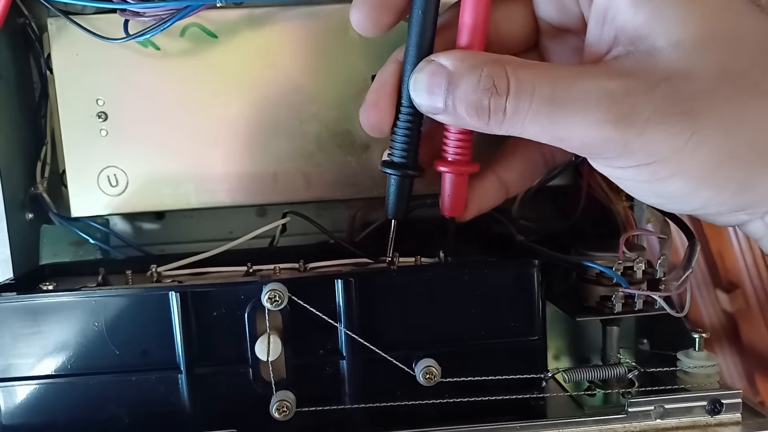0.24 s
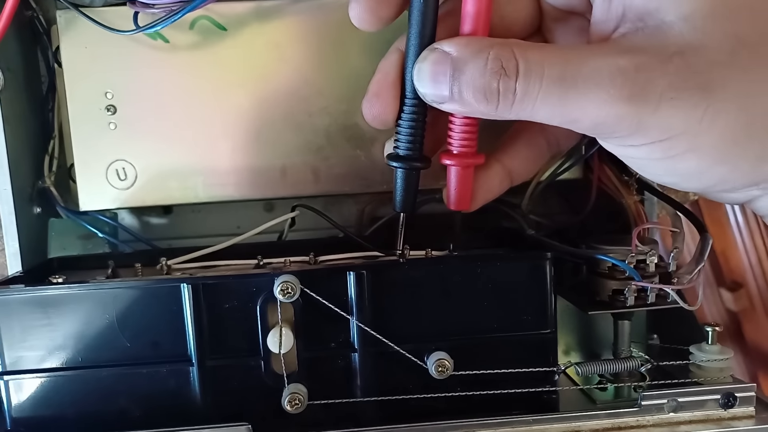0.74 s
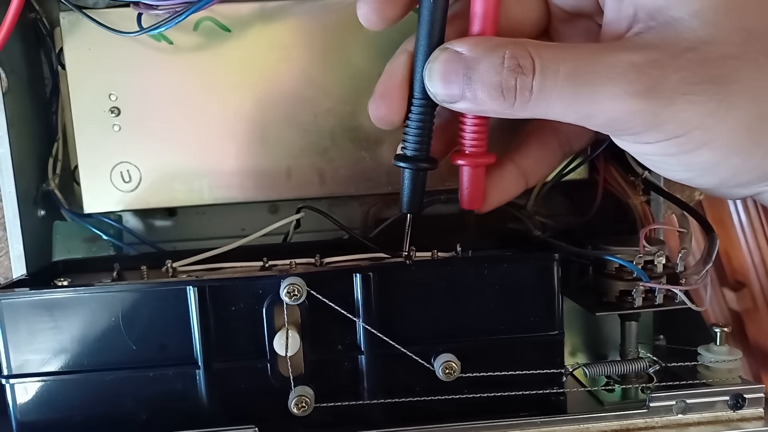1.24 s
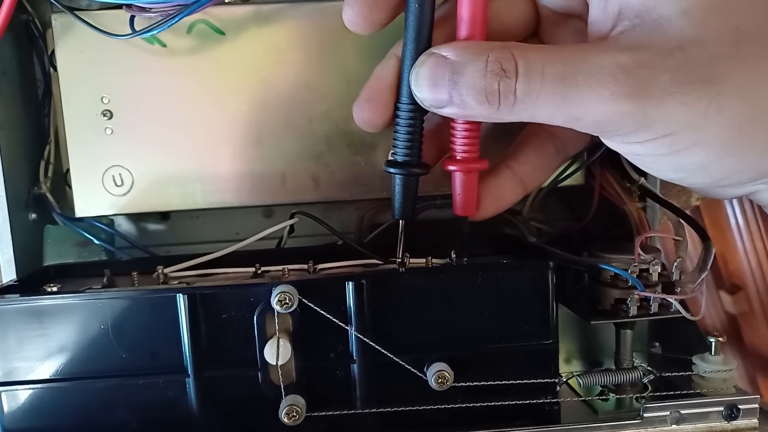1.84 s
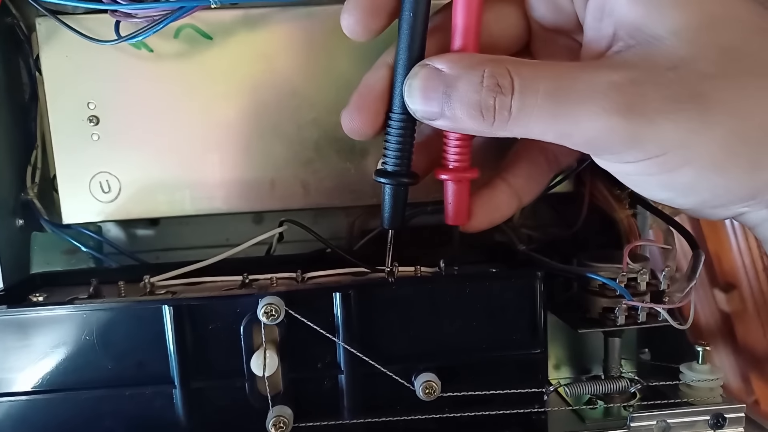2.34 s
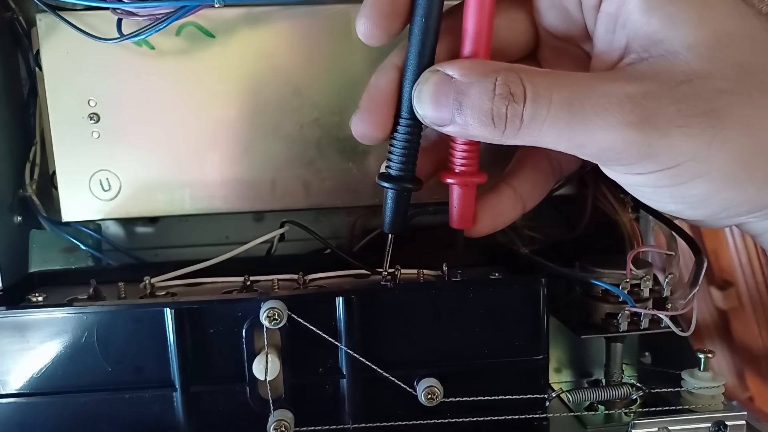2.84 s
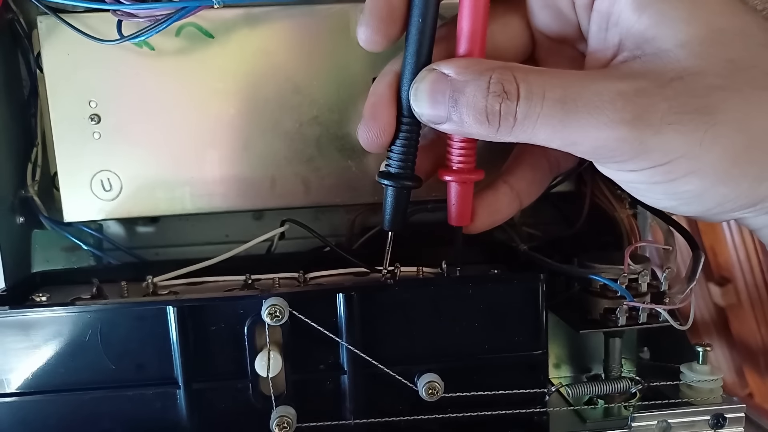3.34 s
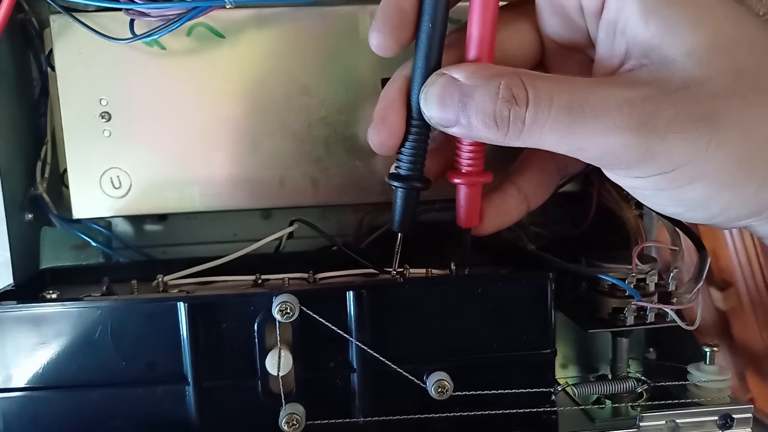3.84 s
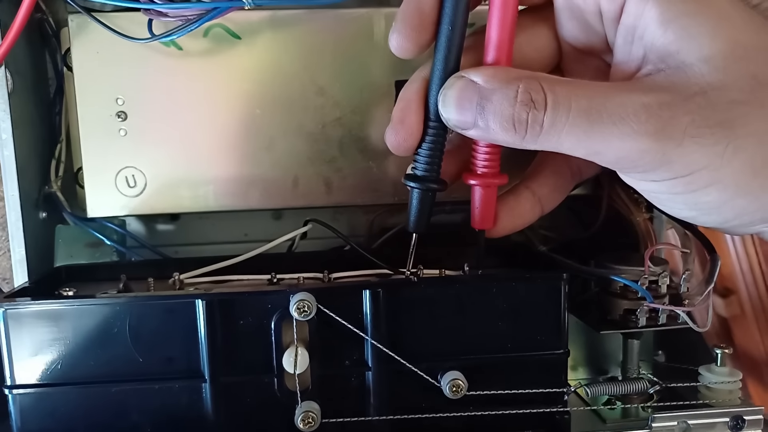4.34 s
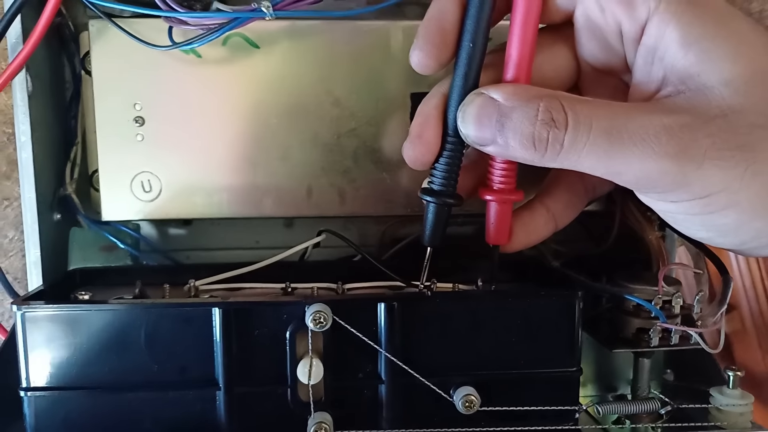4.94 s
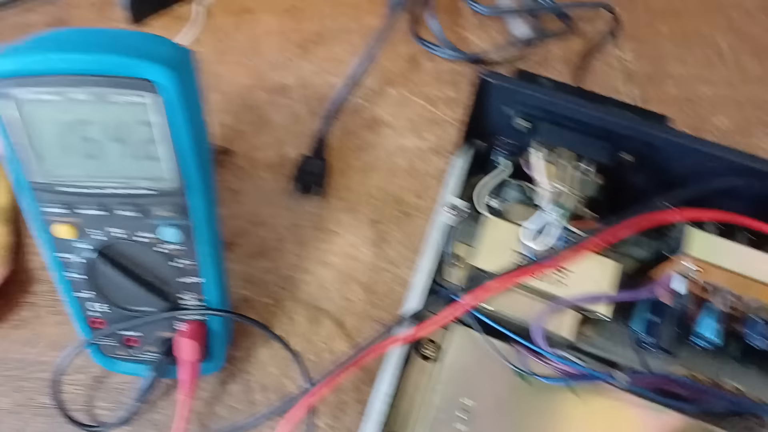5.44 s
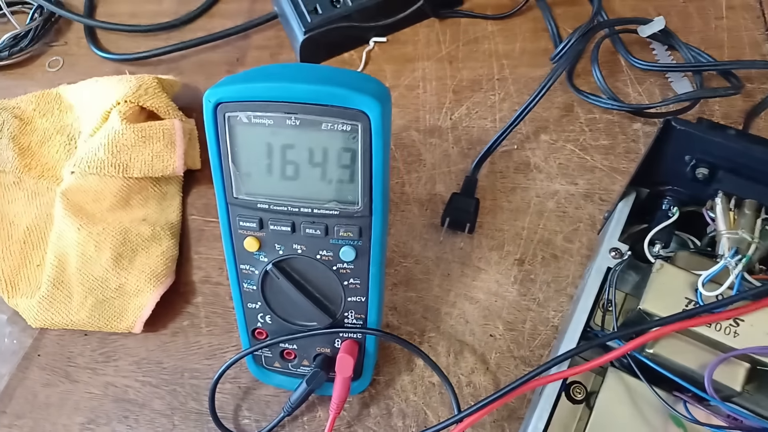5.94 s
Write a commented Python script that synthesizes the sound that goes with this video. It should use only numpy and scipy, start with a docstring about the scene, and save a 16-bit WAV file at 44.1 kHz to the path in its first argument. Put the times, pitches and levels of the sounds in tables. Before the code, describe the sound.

Throughout roughly six seconds, a fan motor gives a low, steady hum around 120 Hz, slowly strengthening and weakening as a nearby tone beats against it. Around it lies a soft, dull rush of air with faint higher blade tones and slight flutter. Between about 0.6 and 3 seconds a very faint far engine glides upward, almost buried. Tiny brushing knocks occur near 0.9, 1.6 and 2.4 seconds. At 2.0 a probe lands on metal: a crisp little tick with a tiny bounce and brief ring. A soft, short ping follows at 2.6. Thin rustles and dull knocks appear around 2.9 to 3.7, then again near 4.9 and 5.5 to 6.1. From 5.2 the handheld stereo microphone swings away; the hum leans right and the air's colour changes slightly. The room is quiet, with faint hiss.

```python
"""Workshop fan with a beating hum

A three-blade fan on a six-pole mains motor runs in a workshop, heard by a hand-held pair of microphones.
The iron hums at twice the mains rate and beats slowly with the sixth shaft order; blade tones sit in the
air rush, which is shaped noise. A probe ticks on a metal chassis and rings its modes; knocks and rustles
are noise bursts, pings and a far engine are sines. Late on, the microphones swing away from the chassis."""
import sys
import numpy as np
from scipy import signal
from scipy.io import wavfile
from scipy.ndimage import uniform_filter1d

SR = 44100
rng = np.random.default_rng(int(sys.argv[2]) if len(sys.argv) > 2 else 0)


def pcm_store(signal):
    """Save signal as 16-bit PCM."""
    levels = np.round(np.clip(np.atleast_2d(signal), -1, 1) * 32767)
    wavfile.write(sys.argv[1], SR, levels.astype(np.int16).T)


N = 273408
TIME = np.arange(N) / SR
HALF_EACH_WAY = np.array([[[.5]], [[-.5]]])  # splits a left-minus-right difference between the channels


def amp(db):
    """Decibel law: a level in dB becomes an amplitude ratio."""
    return 10 ** (np.asarray(db) / 20)


def evened(x):
    """Normalisation: scale to an rms of one."""
    return x / np.sqrt(np.mean(x ** 2) + 1e-20)


def read(points, hz):
    """Logarithmic frequency axis: a spectrum table is joined by straight lines on it."""
    f, value = np.transpose(points)
    return np.interp(np.log(hz + 1), np.log(f + 1), value)


def curve(rows, t=TIME):
    """Linear interpolation: the columns of a table over time."""
    s, *columns = np.transpose(rows)
    return [np.interp(t, s, c) for c in columns]


def wander(rate_hz, count):
    """Slow fluctuation: 16 sines of random phase up to rate_hz sum to curves of rms 1."""
    t = TIME[::64]
    f = np.geomspace(rate_hz / 16, rate_hz, 16)
    starts = rng.random((count, 16))
    slow = [evened(np.sin(2 * np.pi * (f * t[:, None] + p)) @ f ** -.5) for p in starts]
    return np.array([np.interp(TIME, t, w) for w in slow])


def noise(gain, same, size=1024):
    """Partly coherent noise: gain(hz, s) shapes short-time spectra, same(hz) is left-right likeness."""
    hop = size // 4
    frames = N // hop + 5
    hz = np.fft.rfftfreq(size, 1 / SR)[:, None]
    a, b, c, d = rng.standard_normal((frames, size // 2 + 1, 4)).T
    left, other = a + 1j * b, c + 1j * d
    like = np.clip(same(hz), -1, 1)
    right = like * left + np.sqrt(1 - like ** 2) * other
    spectra = np.array([left, right]) * gain(hz, np.arange(frames) * hop / SR)
    return signal.istft(spectra, nperseg=size, noverlap=size - hop)[1][:, :N]


def swing(t):
    """Change of aspect: how far the microphones have turned away from the chassis, 0-1."""
    return np.clip((t - 5.2) / 0.35, 0, 1)


# speed of the fan shaft; columns: time_s, turns_per_s
SHAFT_SPEED = [(0.0, 19.257), (0.62, 19.245), (1.24, 19.236), (1.86, 19.267), (2.48, 19.221), (3.1, 19.241),
               (3.72, 19.215), (4.34, 19.201), (4.96, 19.168), (5.58, 19.163), (6.2, 19.227)]


def shaft_angle():
    """Phase is the integral of frequency: shaft angle in radians."""
    return 2 * np.pi * np.cumsum(curve(SHAFT_SPEED)[0]) / SR


# far engine that speeds up; columns: time_s, pitch_hz, level_db
ENGINE_GLIDE = [(.6, 52.6, -75.5), (.9, 52.8, -47.5), (1.2, 55.1, -68), (1.55, 60.5, -59.5),
                (1.9, 63.5, -59), (2.25, 70.3, -49), (2.5, 69.7, -64), (2.8, 72, -63), (3.0, 73.4, -79)]


def engine():
    """Periodic firing: a low tone from outside, gliding mostly upward."""
    hz, db = curve(ENGINE_GLIDE)
    tone = np.cos(2 * np.pi * np.cumsum(hz) / SR)
    return np.sqrt(2) * amp(db) * tone * amp([[-.7], [.7]])


# colour of the air rush, relative; columns: freq_hz, density_db (per Hz)
AIR_SPECTRUM = [(25, -21), (40, -3), (58, -4), (80, -13), (105, -4), (140, -4), (200, -8.5), (380, -12.5),
                (545, -7), (580, -2.5), (612, -7), (760, -12.5), (1250, -14), (2000, -20.5), (2900, -29),
                (3450, -37), (5600, -48.5), (7500, -56)]
# coherence of the rush between the microphones; columns: freq_hz, likeness (-1 to 1)
AIR_LIKENESS = [(60, 0.93), (96, 0.21), (150, 0.9), (250, 0.94), (390, 0.68), (630, 0.3), (1010, -0.46),
                (1620, -0.36), (2600, 0.11)]
# balance of the rush; columns: freq_hz, left_minus_right_db
AIR_TILT = [(60, -8), (91, -2.5), (140, 0), (210, -3.5), (320, 2), (490, -0.5), (740, -6.5), (1130, 0.5),
            (1710, 5), (2600, 2.5)]
# bands of the rush that stand out after the swing; columns: centre_hz, width_hz, boost_db
SWUNG_BANDS = [(1160, 74, 6.5), (1650, 55, 5.5)]


def air(level_db=-47.5, patchy_db=1.72, swell_db=.5, blade_depth=0.045):
    """Broadband turbulence: a patchy rush through the guard, lightly chopped by each passing blade."""
    patches = rng.standard_normal((N // 512 + 5, 1025)).T
    patches = uniform_filter1d(patches, size=14, axis=0)  # along frequency
    patches = evened(uniform_filter1d(patches, size=6, axis=1))  # along time

    def gain(hz, s):
        bands = sum(db * np.exp(-((hz - f) / width) ** 2 / 2) for f, width, db in SWUNG_BANDS)
        mono_db = read(AIR_SPECTRUM, hz) + swing(s) * bands + patchy_db * patches
        return amp(mono_db + HALF_EACH_WAY * read(AIR_TILT, hz))

    def likeness(hz):
        return np.where(hz > 2800, .05, read(AIR_LIKENESS, hz))

    rush = evened(noise(gain, likeness, size=2048))
    chop = 1 + blade_depth * np.cos(3 * shaft_angle())  # three blades a turn
    return amp(level_db + swell_db * wander(12.0, count=1)) * chop * rush


# puffs of thin rustle, level before the channel balance; columns: start_s, hold_s, level_db
RUSTLE_PUFFS = [(0.184, .02, -79), (0.466, 0.05, -83), (0.728, .02, -81), (0.922, 0.027, -81),
                (1.24, .1, -79), (1.56, 0.27, -79.5), (1.822, 0.27, -74.5), (2.25, .08, -80),
                (2.495, .05, -76.5), (2.74, 0.028, -81), (2.9, .12, -80), (3.106, 0.27, -73),
                (3.395, 0.078, -73.5), (3.54, 0.11, -73.5), (3.736, 0.15, -80), (4.87, .03, -79),
                (5.22, .1, -85), (5.45, .04, -80), (5.697, 0.045, -76.5), (5.83, 0.08, -75),
                (6.05, 0.054, -74.5)]


def rustle(centre_hz=4600, width_hz=520, skirt_db=-18, uneven_db=1.5, bed_db=-82, rise_s=0.027, t60_s=0.31):
    """Addition of powers: puffs of wide-skirted band noise rise, hold and die over a faint bed."""
    def gain(hz, s):
        off = (hz - centre_hz) / width_hz
        return np.exp(-off ** 2 / 2) + amp(skirt_db) / (1 + (off / 2.5) ** 2)

    power = amp(bed_db) ** 2
    for at, hold_s, db in RUSTLE_PUFFS:
        fade_db = -60 * np.maximum(TIME - at - rise_s - hold_s, 0) / t60_s
        rise = np.clip((TIME - at) / rise_s, 0, 1)
        power = power + (rise * amp(db + fade_db)) ** 2
    balance_db = np.array([[-1.5], [3.5]])  # stronger on the right
    level = np.sqrt(power) * amp(uneven_db * wander(25.0, count=1) + balance_db)
    return level * evened(noise(gain, lambda hz: 0.045 + 0 * hz, size=512))


# soft knocks and brushes in the room, levels relative to one another;
# columns: start_s, level_db, centre_hz, spread_octaves, t60_s, left_minus_right_db
ROOM_KNOCKS = [(.185, -74, 6000, 1.1, 0.23, 4), (.924, -54.5, 2000, 0.53, 0.25, 1.5),
               (1.56, -57, 2280, 0.39, 1.04, 2), (1.86, -80, 6480, .3, 0.89, 9),
               (2.444, -52, 1800, 0.32, 0.079, 7), (2.9, -54, 2280, .35, 0.42, 0.5),
               (3.16, -63, 2770, .4, .5, 3), (3.3, -60, 2450, 0.4, 1.4, 0.5),
               (3.57, -61.5, 2270, 0.34, 0.64, 2.5), (4.883, -53.5, 2500, .35, 0.14, 0),
               (5.45, -57.5, 2200, 0.5, 0.21, 4), (5.66, -56.5, 2320, 0.4, 0.92, -2.5),
               (6.07, -62, 2500, .5, 0.2, 3)]


def knocks(rise_share=0.031):
    """Reverberant decay: each knock is a burst of noise round its centre, rising in a share of its t60."""
    def gain(hz, s):
        total = 0
        for at, db, centre_hz, octaves, t60, pan_db in ROOM_KNOCKS:
            age, rise_s = s - at, rise_share * t60
            fade = amp(-60 * np.maximum(age - rise_s, 0) / t60)
            shape = np.clip(age / rise_s, 0, 1) * fade
            colour = np.exp(-(np.log2((hz + 1) / centre_hz) / octaves) ** 2 / 2)
            colour = colour / np.linalg.norm(colour)  # a wide knock is no stronger than a narrow one
            total = total + amp(db + HALF_EACH_WAY * pan_db) * colour * shape
        return total

    return noise(gain, lambda hz: 0.17 + 0 * hz, size=256)


# a small object rings softly, level before rise and balance; columns: start_s, level_db, pitch_hz, t60_s
SOFT_PINGS = [(2.598, -46.5, 1030, 0.19), (2.633, -49, 1017, 0.074)]


def pings(rise_s=0.01):
    """Free damped vibration: single soft tones swell quickly and die."""
    out = np.zeros(N)
    for at, db, hz, t60 in SOFT_PINGS:
        age = np.maximum(TIME - at, 0)
        envelope = amp(db - 60 * age / t60) * np.minimum(age / rise_s, 1)
        out = out + envelope * np.sin(2 * np.pi * hz * age)
    return out * amp([[1.5], [-1.5]])


# the probe tip lands and bounces, relative level; columns: start_s, level_db, treble_lift_db
PROBE_TICKS = [(2.0112, -33.5, -13), (2.016, -44.5, 21)]
# modes of the chassis, relative level before the treble lift; columns: mode_hz, level_db, t60_s
CHASSIS_MODES = [(500, -9, 0.11), (577, -6.5, 0.15), (900, 1, 0.057), (1069, 0, 0.045), (1430, -1, 0.036),
                 (2235, -10, 0.033), (2980, -11, 0.025), (3700, -26, 0.019), (4700, -17.5, 0.016),
                 (5670, -29, 0.014)]


def probe(crack_db=-14, tail_db=-13, rise_s=0.0011):
    """Modal excitation: the tip grates and rings the chassis modes; a short dull room tail follows."""
    out, t = np.zeros((2, N)), np.arange(SR // 4) / SR
    late = t - np.array([[0], [.0002]])  # the right port hears the ring later
    for at, db, lift_db in PROBE_TICKS:
        ring = 0
        for k, (hz, level, t60) in enumerate(CHASSIS_MODES):
            sense = (-1) ** k  # neighbouring modes start in opposite sense at the point of contact
            mode_db = level + (hz > 3400) * lift_db - 60 * t / t60
            ring = ring + sense * amp(mode_db) * np.sin(2 * np.pi * hz * late)
        grit = signal.lfilter([1], [1, -1.5, .62], rng.standard_normal((2, len(t))))  # dull noise
        crack = amp(crack_db + lift_db / 2 - 60 * t / 0.039) * evened(grit)
        tick = amp(db) * (ring + crack) * np.minimum(t / rise_s, 1) * amp([[1.5], [-1.5]])
        first = round(at * SR)
        out[:, first:first + len(t)] += tick
    tail = rng.standard_normal((2, len(t))) * amp(-60 * t / 0.22) * (t > .006)
    tail = signal.lfilter([1], [1, -.85], tail)  # walls swallow the treble
    tail = tail / np.linalg.norm(tail[0])
    return out + amp(tail_db) * signal.oaconvolve(out, tail, axes=1)[:, :N]


# sixth shaft order, which sets the depth of the beat, before the channel balance; columns: time_s, level_db
SIXTH_ORDER = [(0.0, -41), (0.52, -48.5), (1.03, -42.5), (1.55, -45.5), (2.07, -58.5), (2.33, -46.5),
               (2.58, -51), (2.84, -46), (3.36, -50), (3.62, -43.5), (4.13, -45), (4.39, -40.5),
               (4.65, -46.5), (4.91, -41.5), (5.3, -49.5), (5.7, -43), (6.2, -50)]


def beating_hum(hum, shaft, hum_hz, level_db=-35, lead_cycles=-0.34, port_s=0.000085):
    """Beating: the steady iron hum and the nearby sixth shaft order drift in and out of step."""
    lag = np.array([[0], [1]]) * 2 * np.pi * port_s * hum_hz  # sound reaches the right port later
    iron = amp(level_db) * np.cos(hum - lag)
    # the sixth order's phase relative to the hum at the start is lead_cycles
    sixth = amp(curve(SIXTH_ORDER)[0]) * np.cos(6 * shaft + 2 * np.pi * lead_cycles - lag)
    balance_db = [[-1], [1]] * (0.42 + .7 * swing(TIME))  # the swing favours the right port
    return (iron + sixth) * amp(balance_db)


# blade and shaft tones, mean levels; the multiple of shaft speed is rounded to a whole one for pitch;
# columns: multiple, left_db, right_db
SHAFT_ORDERS = [(3, -58.5, -54.5), (9, -73.5, -65), (11, -62.5, -63), (12.3, -59.5, -61.5),
                (13, -64.5, -66), (15, -54.0, -55.5), (21.2, -71, -69), (23, -72, -70.5), (24, -72, -74),
                (25, -71.5, -75.5), (27, -60, -60), (28, -77, -70), (29.2, -73.5, -71), (30, -63.5, -58),
                (30.46, -70, -64.5), (33, -66, -66), (36.4, -80, -75.5), (39, -66.5, -66),
                (42, -80.5, -68.5), (45, -69, -64.5), (48, -87, -82), (62.78, -69.5, -74.5)]
# hum chopped by the rotor, at hum + rounded multiple of shaft speed; columns: multiple, left_db, right_db
HUM_SIDEBANDS = [(1, -73.5, -67.5), (2, -58.5, -61.5), (5, -69, -59), (7, -64, -66.5), (9, -71, -69.5),
                 (12, -79, -73), (17, -74.5, -69.5), (21, -85, -78.5), (22, -71.5, -64.5),
                 (24.2, -66.5, -61.5), (26, -80.5, -63.5), (30, -92, -76)]
# slow swell of the fifth blade tone about its mean; columns: time_s, swell_db
FIFTH_SWELL = [(0.0, -2), (0.2, -0.5), (0.36, -6), (0.65, -2), (0.95, 2), (1.7, 1), (2.7, -4), (3.05, 2),
               (3.35, -0.5), (3.5, 0.5), (4.75, -2), (5.15, 2), (6.05, -0.5), (6.2, -11)]
# slow swell of the ninth and tenth blade tones about their mean; columns: time_s, swell_db
TENTH_SWELL = [(0.0, 2.5), (0.6, -2.5), (1.4, -1), (2.0, -2), (2.8, -3), (3.3, 5.5), (4.0, 3.5), (4.8, 1),
               (5.4, -0.5), (5.8, 4.5), (6.2, -4)]


def motor(hum_hz=119.954, waver_db=1.5, waver_rad=0.15, flutter_rad=0.0067):
    """Modulation: beating hum, shaft orders and sum tones; turbulence makes each weak tone waver."""
    shaft, hum = shaft_angle(), 2 * np.pi * hum_hz * TIME
    out = beating_hum(hum, shaft, hum_hz)
    tones = [(0, *row) for row in SHAFT_ORDERS] + [(1, *row) for row in HUM_SIDEBANDS]
    drift = wander(9.0, count=2 * len(tones))
    start = rng.random((len(tones), 2))
    ninth_tenth = curve(TENTH_SWELL)[0]
    swells = {5: curve(FIFTH_SWELL)[0], 9: ninth_tenth, 10: ninth_tenth}
    for k, (on_hum, order, left_db, right_db) in enumerate(tones):
        blade_tone = 0 if on_hum else round(order) / 3
        swell_db = waver_db * drift[2 * k + 1]
        if blade_tone in swells:
            swell_db = swell_db + swells[blade_tone]
        wobble = (waver_rad + flutter_rad * order) * drift[2 * k]  # high orders blur more
        angle = on_hum * hum + round(order) * shaft + 2 * np.pi * start[k, 0] + wobble
        apart = (start[k, 1] - .5) * order * .08  # room paths scatter the high tones between the ports
        out = out + amp([[left_db], [right_db]] + swell_db) * np.cos(angle - [[0], [apart]])
    return np.sqrt(2) * out  # levels are rms


def scene():
    """Superposition: all sources add at the two microphones."""
    return engine() + air() + rustle() + knocks() + pings() + probe() + motor()


# colour of the microphone noise, relative; columns: freq_hz, density_db (per Hz)
HISS_SPECTRUM = [(3000, -24), (7000, -11), (9000, -3), (11500, 3.5), (15700, 0.5)]


def record(dry, hiss_db=-80.5, edge_hz=15720):
    """Band limiting: the microphones lose the deepest bass and add hiss; then the treble is cut off."""
    bass_cut = signal.butter(N=3, Wn=42, btype="high", fs=SR, output="sos")
    thin = signal.sosfilt(bass_cut, dry)

    def gain(hz, s):
        return amp(read(HISS_SPECTRUM, hz)) * (hz > 2000)

    hiss = amp(hiss_db) * evened(noise(gain, lambda hz: .05 + 0 * hz))
    band_limit = signal.firwin(1023, edge_hz, window=("kaiser", 9), fs=SR)
    return signal.oaconvolve(thin + hiss, band_limit[None], "same")


dry = scene()
out = record(dry)
pcm_store(out)
```